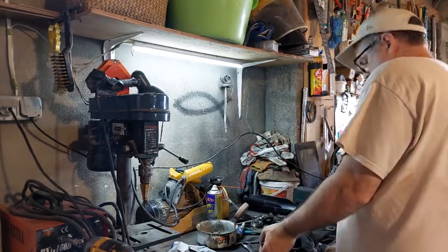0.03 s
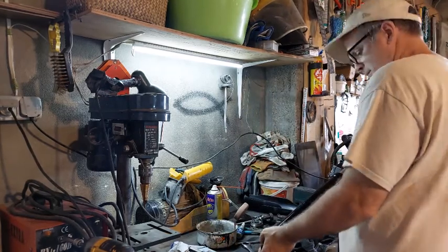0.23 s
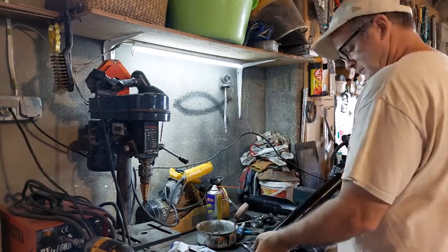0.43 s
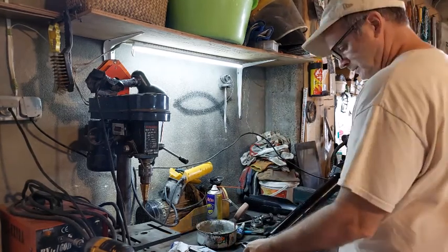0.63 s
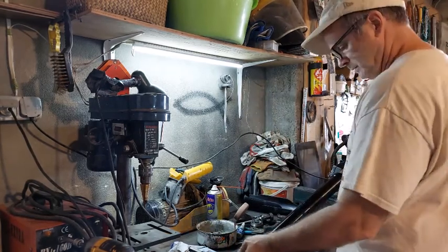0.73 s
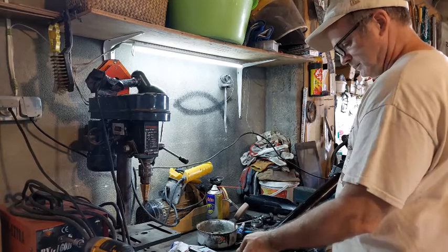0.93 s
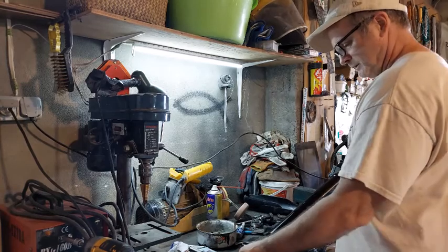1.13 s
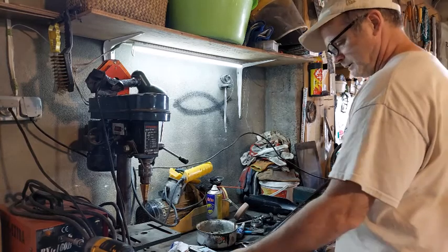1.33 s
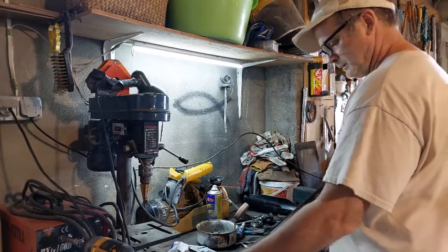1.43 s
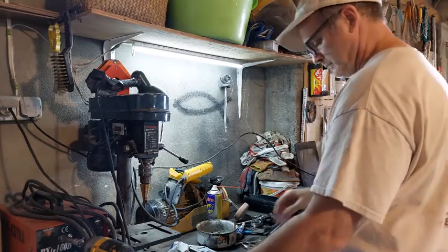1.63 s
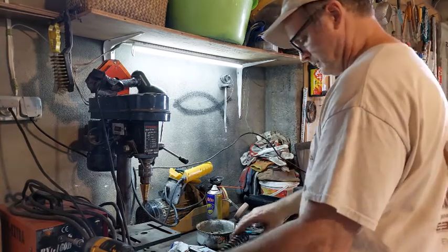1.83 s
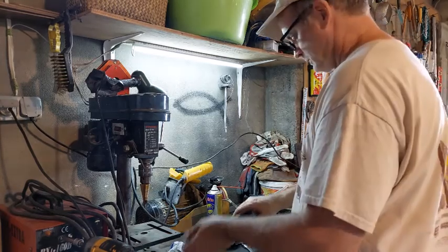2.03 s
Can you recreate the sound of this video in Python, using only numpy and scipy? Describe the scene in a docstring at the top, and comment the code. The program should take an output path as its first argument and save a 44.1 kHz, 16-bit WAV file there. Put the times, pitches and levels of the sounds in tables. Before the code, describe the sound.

A heavy metal part lands on a workbench with a ringing clunk. A steel tool clinks a few times, scrapes across the top with a brief squeal, then rattles as it is picked up in a small garage.

```python
"""Metal parts on a garage workbench

A heavy part lands with a clunk that rings both the metal and the bench. A steel tool is nudged and
clinks, chatters and squeals as it is dragged across the top, then rattles as it is picked up, its
ring damped by the hand. Light knocks and faint rubbing fill the gaps, and the small room answers
briefly over a low rumble."""
import sys
import numpy as np
from scipy import signal
from scipy.fft import rfft, irfft
from scipy.io import wavfile
from scipy.ndimage import uniform_filter1d

SR = 44100
rng = np.random.default_rng(int(sys.argv[2]) if len(sys.argv) > 2 else 0)


def dump_mix(stems):
    """Bounce the given channels to the path in sys.argv[1] as a 16-bit WAV at rate SR."""
    frames = np.atleast_2d(stems).T  # one column per channel
    limited = np.clip(frames, -1, 1)  # hard clip at full scale
    pcm = np.round(limited * 32767).astype(np.int16)
    wavfile.write(sys.argv[1], SR, pcm)


N = 92610  # 2.1 s


def amp(db):
    """Decibels to gain."""
    return 10 ** (np.asarray(db) / 20)


def curve_at(points, hz):
    """A curve's value, interpolated on a log-frequency axis."""
    f, value = np.transpose(points)
    return np.interp(np.log(hz + 1), np.log(f + 1), value)


def unit(x):
    """Scales to energy 1 per channel."""
    return x / np.sqrt((x ** 2).sum(-1, keepdims=True) + 1e-20)


def through(x, response):
    """Convolves, cut to at most the scene's length."""
    return signal.fftconvolve(x, response)[:N]


def colour(points, size=4096):
    """An EQ curve as a minimum-phase response of energy 1."""
    hz = abs(np.fft.fftfreq(size, 1 / SR))
    log_gain = np.log(amp(curve_at(points, hz)))
    spectrum = np.exp(np.conj(signal.hilbert(log_gain)))
    return unit(np.fft.ifft(spectrum).real[:size // 2])


def noise_tail(t60s, size=32768):
    """Dense noise that dies away at each band's own speed."""
    hz, t, spectrum = signal.stft(rng.choice([-1., 1.], size), SR, nperseg=256)
    decay = amp(-60 * t / curve_at(t60s, hz)[:, None])
    _, tail = signal.istft(spectrum * decay, SR, nperseg=256)
    return unit(tail[:size])


def burst(t60):
    """A short crunch of contact, energy 1."""
    t = np.arange(SR // 4) / SR
    return unit(rng.choice([-1., 1.], len(t)) * amp(-60 * t / t60))


def ring(modes):
    """Decaying sines at random phases, each with its energy given in dB."""
    t = np.arange(SR * 2 // 3) / SR
    return sum(amp(db) * unit(np.sin(2 * np.pi * (hz * t + rng.random())) * amp(-60 * t / t60))
               for hz, db, t60 in modes)


def add(mix, at_s, sound):
    """Mixes a sound in at a time."""
    span = mix[round(at_s * SR):][:len(sound)]
    span += sound[:len(span)]


def friction(envelope, per_s, spread_db):
    """Tiny random collisions whose strength follows a level envelope."""
    grains = (rng.random(N) < per_s / SR) * rng.choice([-1., 1.], N)
    grains *= amp(spread_db * np.minimum(rng.exponential(1, N), 4))
    level_db = np.interp(np.arange(N) / SR, *np.transpose(envelope), left=-150, right=-150)
    return unit(grains) * np.sqrt(N) * amp(level_db)


def stereo_pair(left, other):
    """Two unrelated signals become a stereo pair, alike in the bass and wide in the treble."""
    # left-right likeness: f/Hz, correlation
    likeness = [(30, 0), (130, 0.72), (300, 0.64), (600, 0.45), (1500, 0), (4000, 0), (16000, 0)]
    shared = curve_at(likeness, np.fft.rfftfreq(len(left), 1 / SR))
    right = irfft(shared * rfft(left) + np.sqrt(1 - shared ** 2) * rfft(other), len(left))
    return np.array([left, right])


def garage(x, wet_db, pan_db, lag_ms):
    """Direct sound plus a short room tail; pan_db favours the left, lag_ms delays its direct sound."""
    # reverb time: f/Hz, t60/s
    room_t60 = [(100, 0.13), (400, .36), (1200, 0.28), (4500, 0.27), (10000, 0.2), (16000, 0.35)]
    tail = stereo_pair(noise_tail(room_t60), noise_tail(room_t60))[:, :SR // 2]
    fade_in = np.clip(np.arange(tail.shape[1]) / SR / 0.0021 - .3, 0, 1)
    reverb = np.array([through(x, side) for side in unit(tail * fade_in)])
    delay = np.exp(-2j * np.pi * np.fft.rfftfreq(N, 1 / SR) * lag_ms / 1000)
    direct = np.array([irfft(rfft(x) * delay, N), x])
    pan = amp([[pan_db / 2], [-pan_db / 2]])
    return (direct + amp(wet_db) * reverb) * pan / np.sqrt(1 + amp(wet_db) ** 2)


def room_tone(level_db=-67.5):
    """Low rumble, leaning left, and a faint hiss."""
    # rumble and hiss spectrum: f/Hz, level/dB
    tone_eq = [(20, -15.5), (35, -13.5), (48, 0), (65, -6), (130, -3.5), (230, -13.5), (330, -17),
               (500, -21), (900, -27.5), (1400, -27.5), (2300, -32), (3440, -35), (6000, -37.5),
               (8700, -35.5), (10000, -28), (11300, -21.5), (12000, -36), (15700, -34)]
    # left minus right: f/Hz, level/dB
    balance = [(30, 7), (70, 16), (150, 11.5), (500, 8), (4000, -1.5), (16000, 0)]
    hz = np.fft.rfftfreq(N, 1 / SR)
    gain = amp(curve_at(tone_eq, hz) + np.array([[.5], [-.5]]) * curve_at(balance, hz))
    white = stereo_pair(*rng.standard_normal((2, N)))
    noise = irfft(rfft(white) * gain, N)
    return amp(level_db) * noise / noise.mean(0).std()


def slide():
    """Parts rub faintly on the bench under the hand."""
    # rubbing envelope: t/s, level/dB
    envelope = [(.07, -92.5), (.11, -65), (.14, -65.5), (.2, -71.5), (.33, -58.5), (.45, -55), (.54, -60),
                (.6, -53), (.65, -57.5), (.7, -64.5), (.75, -64), (.785, -54.5), (.82, -72), (.93, -78.5),
                (1.08, -69.5)]
    # rubbing spectrum: f/Hz, level/dB
    rub_eq = [(88, -37.5), (150, -8), (1240, -9), (2100, -10.5), (2550, -18), (2810, -11), (3490, -19.5),
              (4670, -12.5), (6020, -20.5), (13200, -19.5), (16000, -29.5)]
    rub = through(friction(envelope, per_s=5700, spread_db=-1), colour(rub_eq))
    return garage(rub, wet_db=3, pan_db=1.5, lag_ms=-0.037)


def metal_tones(gain_db=1):
    """Short wavering tones: lingering rings after the clunk and clinks, and squeals from the drag."""
    # wavering metal tones: t/s, length/s, f/Hz, width/Hz, level/dB
    tones = [(.228, 0.044, 5384, 57, -40), (0.223, 0.064, 5520, 100, -49.5),
             (0.419, 0.052, 2800, 62, -65.5), (0.446, 0.047, 4730, 24, -61.5),
             (0.569, 0.016, 4654, 13, -48.5), (0.61, 0.057, 4658, 10, -55.5), (0.769, 0.02, 5030, 250, -61),
             (.82, 0.59, 2293, 230, -75.5), (1.08, 0.074, 1131, 42, -60), (1.17, 0.028, 1192, 28, -41),
             (1.24, 0.067, 1118, 5.6, -41), (1.254, 0.019, 10850, 180, -40),
             (1.283, 0.025, 4960, 60, -36.5), (1.287, 0.042, 5230, 160, -44.5),
             (1.29, 0.018, 10840, 250, -43.5), (1.333, 0.04, 10120, 47, -51)]
    out = np.zeros(N)
    for at_s, length, hz, width_hz, db in tones:
        t = np.arange(0, length, 1 / SR)
        phase_drift = np.cumsum(rng.standard_normal(SR)[:len(t)]) * np.sqrt(2 * np.pi * width_hz / SR)
        tone = np.sqrt(2) * np.sin(2 * np.pi * hz * t + uniform_filter1d(phase_drift, size=40))
        swell = np.sin(np.pi * t / length)
        add(out, at_s, amp(db + gain_db) * swell * tone)
    return garage(out, wet_db=2, pan_db=3, lag_ms=0)


def knocks(gain_db=4, ring_t60=.05):
    """Dull taps on the bench top, each with one short ring."""
    # light hits: t/s, tap level/dB, ring f/Hz, ring level/dB
    taps = [(.147, -26.5, 485, -25.5), (.16, -32, 470, -24.5), (0.198, -34, 506, -30),
            (.327, -22, 1180, -18.5), (.345, -23.5, 919, -22.5), (0.574, -35.5, 1270, -31.5),
            (0.621, -35, 1245, -27), (.753, -26.5, 500, -42.5), (.778, -39.5, 1152, -32),
            (1.221, -24.5, 449, -26.5), (1.446, -31.5, 258, -26.5), (1.458, -30, 1141, -25),
            (1.486, -37, 560, -35.5)]
    # tap spectrum: f/Hz, level/dB
    tap_eq = [(60, -23), (200, -11.5), (500, 11), (800, -6.5), (1200, -8.5), (2200, -19), (4000, -28.5),
              (16000, -39)]
    out = np.zeros(N)
    for at_s, tap_db, hz, ring_db in taps:
        add(out, at_s, amp(tap_db) * unit(through(burst(t60=.02), colour(tap_eq))))
        add(out, at_s, ring([(hz, ring_db, ring_t60)]))
    return garage(amp(gain_db) * out, wet_db=4, pan_db=2.5, lag_ms=0)


def drag(ring_db=-7, catch_db=7):
    """The tool chatters over the bench, sounding its resonances; its edge catches once and rasps."""
    # friction envelope: t/s, level/dB
    envelope = [(1.05, -72.5), (1.118, -59.5), (1.132, -46), (1.165, -38.5), (1.185, -36), (1.215, -38.5),
                (1.245, -37.5), (1.262, -33.5), (1.28, -43.5), (1.303, -33), (1.322, -42.5), (1.345, -57.5),
                (1.38, -78.5)]
    # grit spectrum: f/Hz, level/dB
    grit_eq = [(90, -38), (200, -19), (370, -9), (480, -6.5), (750, -4.5), (1120, -0.5), (1480, -3.5),
               (2020, -4), (2900, -2.5), (3620, -6), (4800, 1.5), (6000, -8), (7000, -6.5), (8200, -7),
               (9200, -25), (10100, -11), (10900, -1), (12500, -14), (16000, -17)]
    # modes of the tool pressed on the bench: f/Hz, level/dB, t60/s
    pressed_modes = [(478, -5, 0.1), (541, -11.5, .07), (1112, -2, 0.18), (1185, -4, .11),
                     (2040, -11, 0.07), (4480, -16, 0.034), (4630, -4.5, .18), (4477, -5.5, 0.0816),
                     (10000, -6, .2)]
    # edge catch: t/s, level/dB, t60/s
    catches = [(1.189, -7, 0.066)]
    # rasp spectrum: f/Hz, level/dB
    rasp_eq = [(200, -19.5), (2000, -13), (5000, -0.5), (8000, 3), (11500, 10), (13700, 8.5), (16000, -5)]
    chatter = friction(envelope, per_s=4000, spread_db=3)
    out = through(chatter, colour(grit_eq)) + amp(ring_db) * through(chatter, ring(pressed_modes))
    for at_s, db, t60 in catches:
        add(out, at_s, amp(db + catch_db) * through(burst(t60), colour(rasp_eq)))
    return garage(out, wet_db=2, pan_db=-0.2, lag_ms=.02)


def clinks(gain_db=7, clack_t60=0.055, grip_from_s=1.0, grip_sustain=.75):
    """Each clack sets the steel tool ringing; soft contacts miss the high modes, the grip damps it."""
    # tool contacts: t/s, ring level/dB, clack level/dB, ring cutoff/Hz
    contacts = [(.329, -29, -29, 6000), (0.41, -32, -52, 4800), (0.422, -26.5, -46.5, 4760),
                (0.456, -34, -59, 4660), (0.572, -23.5, -30, 5140), (0.623, -23, -36, 5170),
                (1.126, -20.5, -25, 7300), (1.133, -25.5, -26.5, 7500), (1.176, -21.5, -25.5, 7000),
                (1.422, -20.5, -21.5, 14000), (1.428, -20, -26, 12400), (1.4385, -13.5, -20, 12000),
                (1.4475, -17, -20.5, 8000), (1.452, -16, -24.5, 7740)]
    # modes of the tool: f/Hz, level/dB, t60/s
    steel_modes = [(1149, -16, 0.15), (4662, -10, 0.047), (4651, -5, 0.21), (4790, -16.5, 0.096),
                   (4880, -12, 0.04), (5420, -11, .05), (10070, -3, 0.097), (9980, -14.5, .18),
                   (10320, -7.5, 0.048)]
    # clack spectrum: f/Hz, level/dB
    clack_eq = [(80, -20.5), (250, -2.5), (550, 3), (1200, -3.5), (2000, 8), (3400, 1.5), (4700, 13.5),
                (6200, 3), (9000, -3.5), (10300, 5), (12000, -1), (16000, -10.5)]
    rings, clacks = np.zeros((2, N))
    for at_s, ring_db, clack_db, cutoff_hz in contacts:
        sustain = grip_sustain if at_s > grip_from_s else 1
        modes = [(hz, db - 10 * np.log10(1 + (hz / cutoff_hz) ** 8), t60 * sustain)
                 for hz, db, t60 in steel_modes]
        add(rings, at_s, amp(ring_db + gain_db) * ring(modes))
        add(clacks, at_s, amp(clack_db + gain_db) * through(burst(clack_t60), colour(clack_eq)))
    return (garage(rings, wet_db=1, pan_db=0, lag_ms=-0.045)
            + garage(clacks, wet_db=2.5, pan_db=2, lag_ms=0))


def heavy_part(thud_db=4, ring_db=7, bark_db=0.5):
    """The part lands on one edge, then flat: a hard bark, a dense wooden thud and a metal ring."""
    # impacts on the bench: t/s, level/dB
    landings = [(0.2093, -1), (0.2154, 0.5), (.2190, 0)]
    # impact spectrum: f/Hz, level/dB
    impact_eq = [(50, -38.5), (140, -9.5), (300, -13.5), (520, -7.5), (700, -13), (900, 3), (1200, 0.5),
                 (1450, -3.5), (2000, -8), (3100, -16.5), (4700, -21.5), (5900, -27.5), (7200, -23.5),
                 (10800, -26.5), (12500, -33.5), (16000, -48.5)]
    # thud decay: f/Hz, t60/s
    thud_t60 = [(120, 0.25), (400, 0.19), (1000, 0.051), (2500, 0.11), (8000, 0.12), (15000, 0.14)]
    # stiff bench-top modes that bark: f/Hz, level/dB, t60/s
    bark_modes = [(936, -5.5, .02), (1170, -0.5, .022), (1567, 2, 0.015), (2031, -3.5, 0.0159)]
    # modes of the part and the bench under it: f/Hz, level/dB, t60/s
    part_modes = [(156, -16, 0.31), (312, -26, 0.43), (655, -15.5, 0.088), (887, -16, 0.55),
                  (905, -13, 0.086), (990, -11.5, 0.095), (1114, -19, 0.84), (1213, -15.5, 0.15),
                  (1518, -19.5, 0.073), (1795, -19, 0.24), (2020, -27, .26), (2633, -20.5, .22),
                  (5335, -25.5, 0.073), (5540, -28, 0.14), (8043, -22.5, 0.42)]
    impact = colour(impact_eq)
    body, bark = np.zeros((2, N))
    for at_s, db in landings:
        add(body, at_s, amp(db + thud_db) * unit(through(noise_tail(thud_t60), impact)))
        add(bark, at_s, amp(db + bark_db) * unit(through(ring(bark_modes), impact)))
    add(body, landings[1][0], amp(ring_db) * ring(part_modes))  # rings from the second impact
    return (garage(body, wet_db=-1, pan_db=1, lag_ms=-0.1)
            + garage(bark, wet_db=-7, pan_db=4.5, lag_ms=-0.13))


def scene():
    """Everything on the bench, over the room tone."""
    return heavy_part() + knocks() + clinks() + drag() + metal_tones() + slide() + room_tone()


def record(dry):
    """A steep low-pass trims the very top of the mix."""
    low_pass = signal.firwin(401, cutoff=15900, window=("kaiser", 9), fs=SR)
    return signal.oaconvolve(dry, low_pass[None], "same")


dry = scene()
out = record(dry)
dump_mix(out)
```